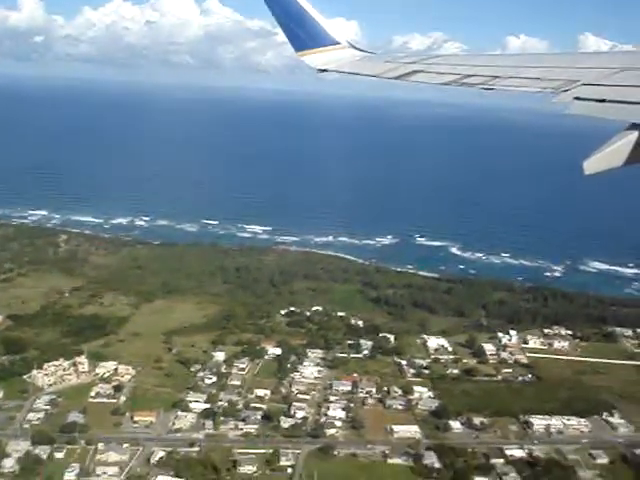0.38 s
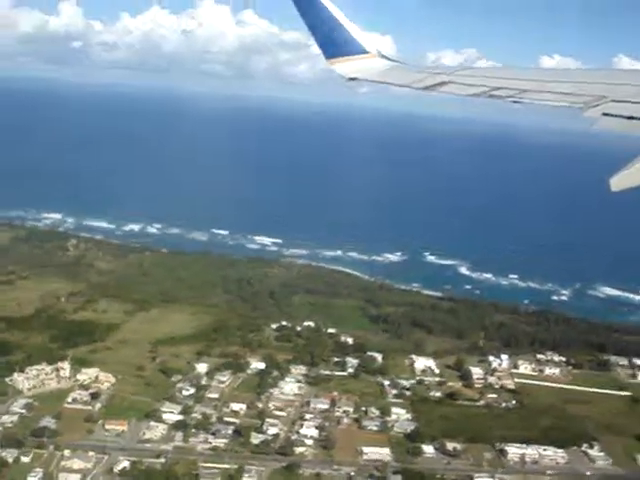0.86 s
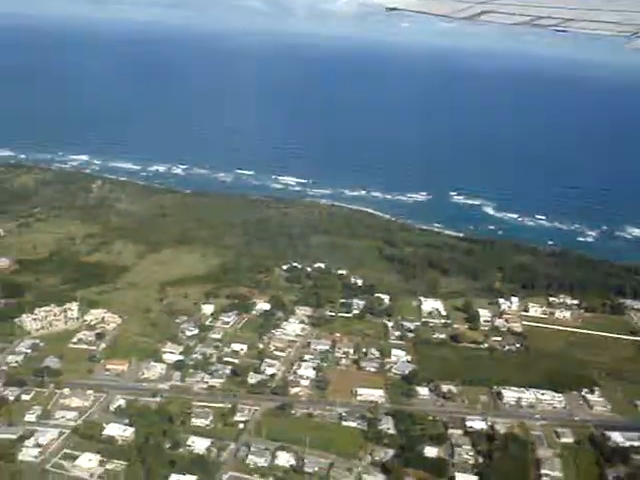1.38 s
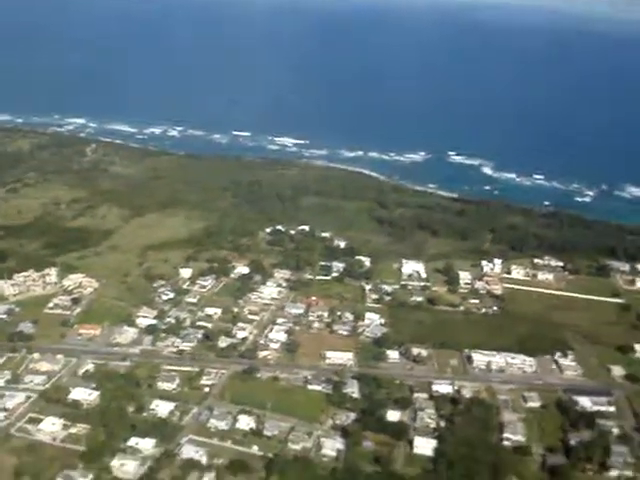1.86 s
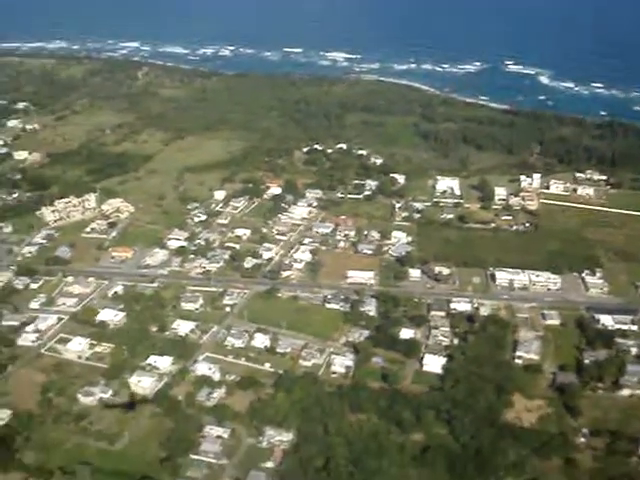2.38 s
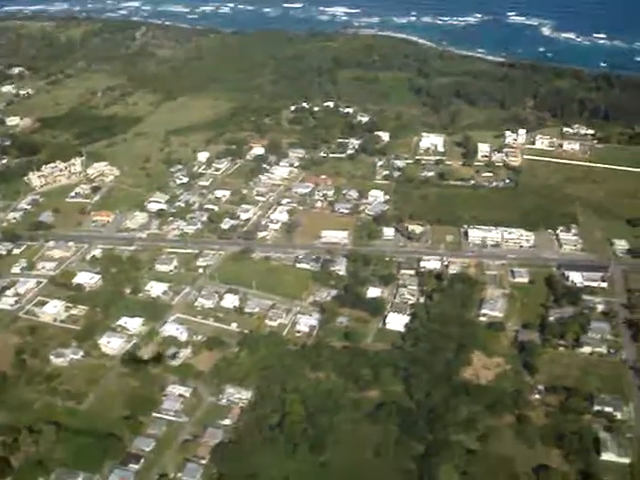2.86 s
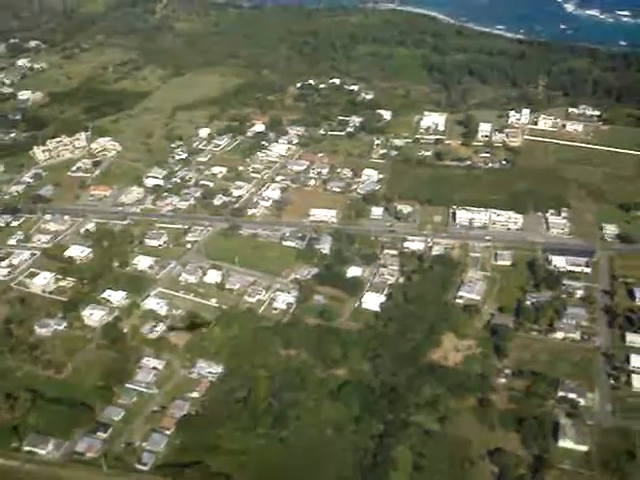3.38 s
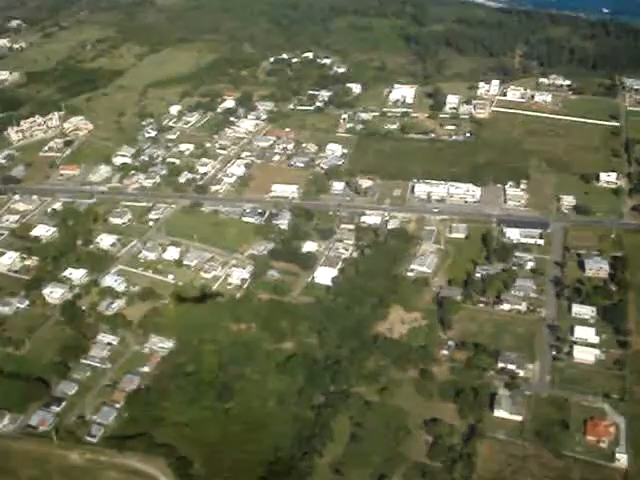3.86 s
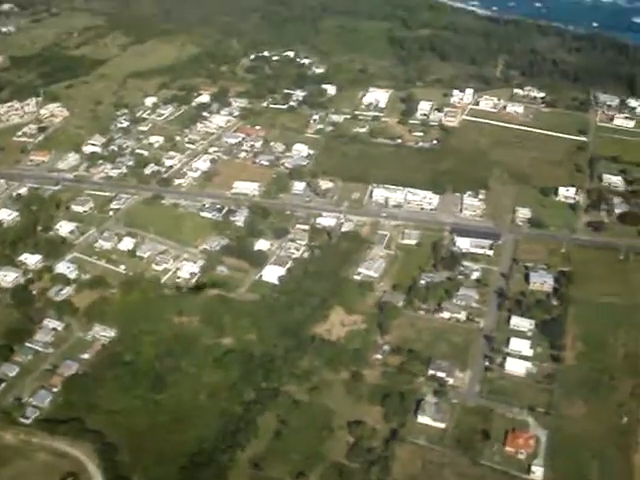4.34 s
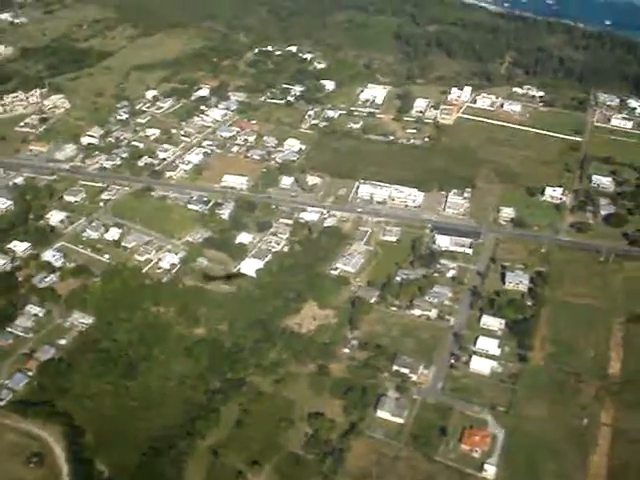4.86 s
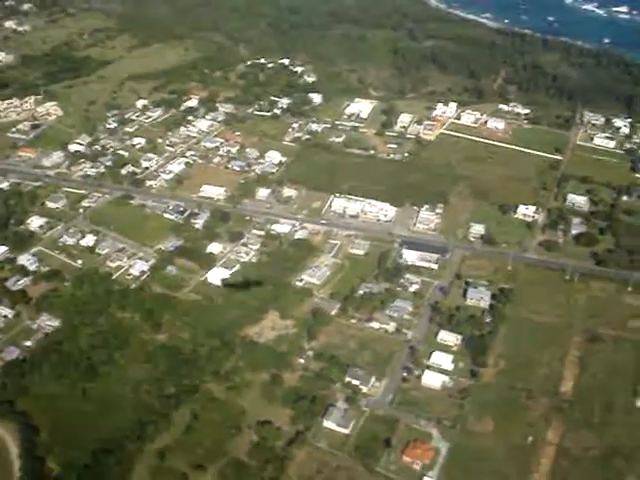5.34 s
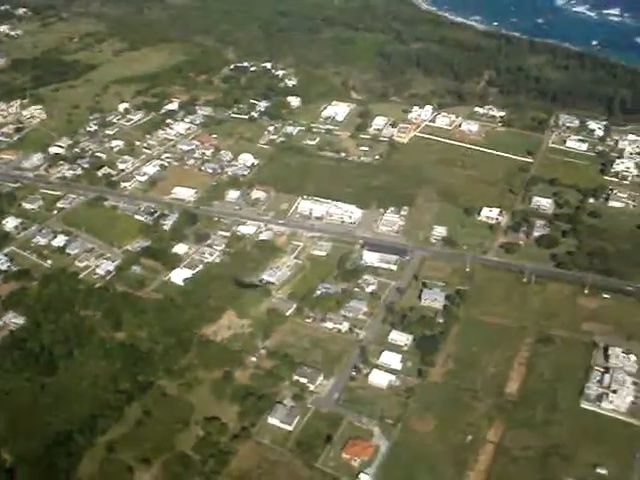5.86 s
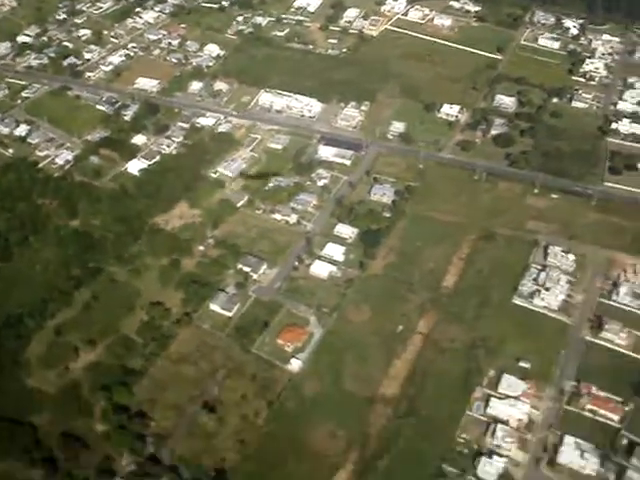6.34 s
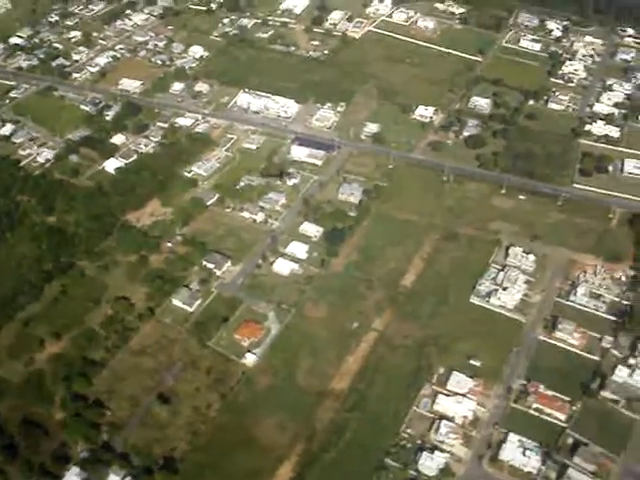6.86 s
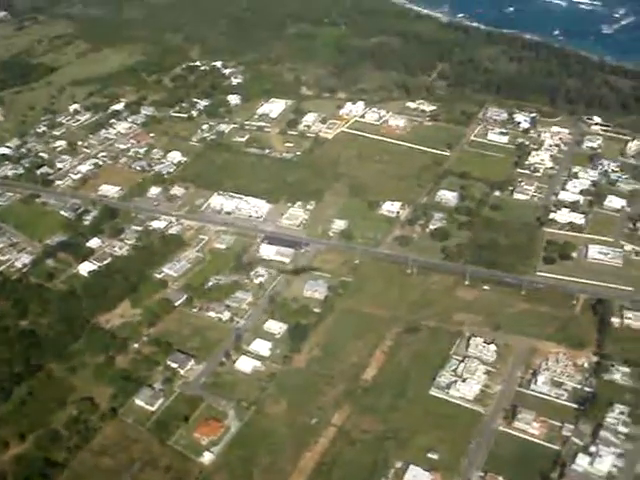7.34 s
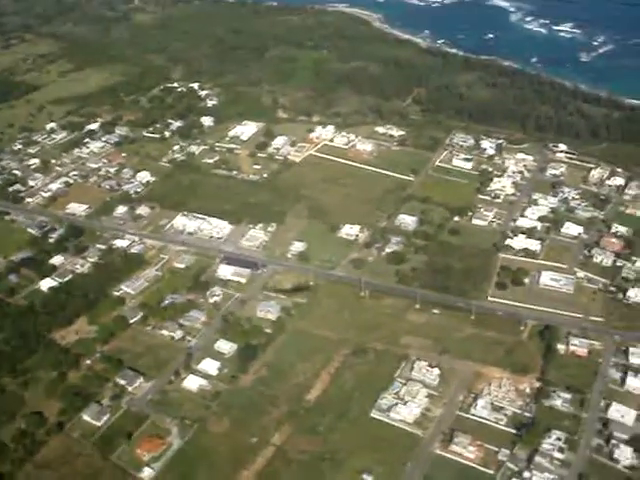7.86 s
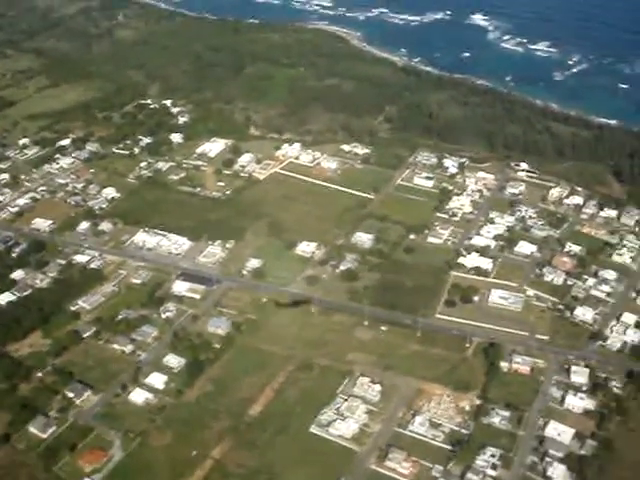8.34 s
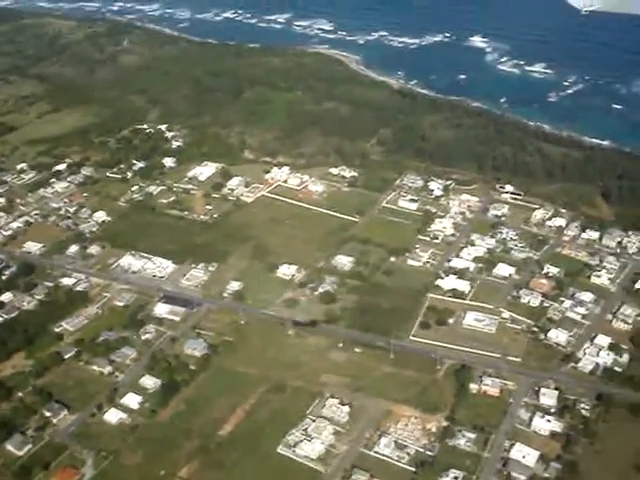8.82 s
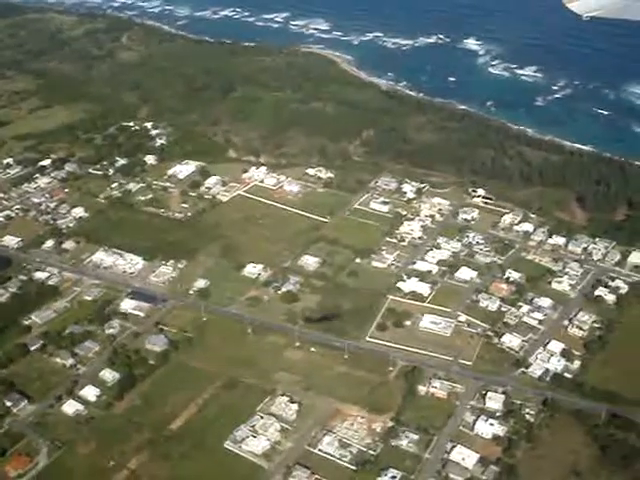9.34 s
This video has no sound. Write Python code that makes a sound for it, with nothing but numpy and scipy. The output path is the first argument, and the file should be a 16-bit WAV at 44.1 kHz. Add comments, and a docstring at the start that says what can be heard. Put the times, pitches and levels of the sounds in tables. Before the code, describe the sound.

Inside a climbing passenger jet near the window, deep engine rumble drones continuously under a flickering hiss of air, the low end crunching with overload.

```python
"""A loud, booming jet roar with a hiss over it: the cabin of a climbing airliner, close to a window.
Jet roar shakes the fuselage and booms in the cabin: shaped noise with resonances.
Air rushing along the skin adds a flickering hiss, combed by its echo off the pane; four soft puffs join it.
A small camera microphone takes it all, and the boom drives its input stage into its rails,
the upper one much sooner."""
import sys
import numpy as np
from scipy import signal
from scipy.fft import rfft, irfft
from scipy.io import wavfile
from scipy.ndimage import uniform_filter1d

SR = 44100
rng = np.random.default_rng(int(sys.argv[2]) if len(sys.argv) > 2 else 0)


def natural_amplitude(level_db):
    """Convert a level in decibels to a linear amplitude factor, elementwise."""
    exponent = np.asarray(level_db, float) / 20
    return 10 ** exponent


def persist_wave(psi):
    """Save psi, clipped to +-1, as 16-bit WAV."""
    counts = np.round(np.clip(psi, -1, 1) * 32767).astype(np.int16)
    wavfile.write(sys.argv[1], SR, np.atleast_2d(counts).T)


N = 417186  # length in samples

# Jet roar through the wall, relative spectrum: [f/Hz, density/dB]
ROAR_SPECTRUM = [(15, -52.5), (25, -28.5), (76, -12.5), (128, -9.5), (167, -6), (238, -7.5), (314, 0.5),
                 (356, -3), (484, -17.5), (629, -15.5), (1000, -34), (1300, -60), (2200, -120)]
# Cabin and wall-panel resonances and dips that the roar excites: [f/Hz, width/Hz, lift/dB]
CABIN_RESONANCES = [(93, 31, 4.5), (110, 12, 1), (132, 14, 0), (182.6, 46, 5.5), (229.7, 18, 5.5),
                    (282.3, 23, 3), (306, 28, 2.5), (320.5, 26, 3.5), (357, 30, 3.5), (425, 37, 3.5),
                    (538, 31, -3.5), (598, 60, 0), (804, 56, 3)]
# Level of the upper roar, which sinks slowly and partly returns: [t/s, level/dB]
UPPER_ROAR_LEVEL = [(0, -31), (.8, -30.5), (3.2, -34), (5.8, -35.5), (7.2, -36.5), (8.4, -32.5),
                    (9.46, -34.5)]
# Air rushing along the skin, relative spectrum: [f/Hz, density/dB]
RUSH_SPECTRUM = [(530, -30.5), (900, -4.5), (1160, -2), (1280, -5), (1740, -7), (2050, -9), (2380, -11.5),
                 (3150, -11), (4170, -18), (5050, -18.5), (8090, -24.5), (9880, -27), (12800, -59.5),
                 (21700, -120)]
# Window and trim resonances and dips in the rush: [f/Hz, width/Hz, lift/dB]
WINDOW_RESONANCES = [(1120, 110, 3.5), (1466, 200, 4), (1990, 50, 3), (2079, 50, 7.5), (2133, 40, -6),
                     (2200, 80, 3.5), (2500, 80, 1.5), (2990, 110, -6), (3088, 90, 5.5), (3200, 120, -1.5),
                     (3510, 100, 1), (3700, 300, 1.5), (4930, 250, 1.5)]
# Level of the hiss: [t/s, level/dB]
HISS_LEVEL = [(0, -38.5), (.5, -37.5), (2, -37.5), (3.1, -37), (5, -37.2), (8.3, -37.5), (9.46, -38)]
# The hand-held microphone drifts near the window, which changes the echo off the pane
# and a broad treble hump that slides down as the echo lengthens: [t/s, echo delay/ms, hump/dB]
PANE_DISTANCE = [(0, .44, 0), (1.2, .44, 0.5), (3, .47, 3.5), (5, .5, 1), (6.6, .49, .5), (8, .48, 3),
                 (9.46, .47, 2.5)]
# Short soft puffs of hiss near the microphone: [t/s, peak level/dB, bell length/s]
PUFF_TIMES = [(1.031, -44, 0.022), (4.051, -53, 0.013), (7.78, -53, 0.018), (8.38, -53.5, .015)]


def evened(x):
    """Scales to rms 1."""
    return x / np.sqrt(np.mean(x ** 2) + 1e-20)


def colour_db(points, resonances, hz):
    """A smooth spectrum, straight over log frequency, with resonance humps and dips on it."""
    f, level = np.transpose(points)
    smooth = np.interp(np.log(hz + 1), np.log(f + 1), level)
    humps = sum(lift / (1 + (2 * (hz - centre) / width) ** 2) for centre, width, lift in resonances)
    return smooth + humps


def above(hz, edge_hz):
    """Share 0-1 that rises smoothly through the edge."""
    return hz ** 4 / (hz ** 4 + edge_hz ** 4)


def bell(x, centre, width):
    """Bell curve of height 1; width is its standard deviation."""
    return np.exp(-.5 * ((x - centre) / width) ** 2)


def curve(rows, t):
    """Columns of a time table, joined by straight lines."""
    s, *columns = np.transpose(rows)
    return [np.interp(t, s, c) for c in columns]


def roar():
    """Steady noise through the cabin resonances; the boom grows slowly, the upper roar drifts."""
    boom_start_db, boom_rise_db_per_s = -14.6, 0.0983
    hz, t = np.fft.rfftfreq(N, 1 / SR), np.arange(N) / SR
    colour = natural_amplitude(colour_db(ROAR_SPECTRUM, CABIN_RESONANCES, hz))
    spectrum = rfft(rng.standard_normal(N)) * colour
    upper_share = above(hz, edge_hz=497) ** 2
    boom = evened(irfft(spectrum * (1 - upper_share), N))
    upper = evened(irfft(spectrum * upper_share, N))
    upper_db, = curve(UPPER_ROAR_LEVEL, t)
    return natural_amplitude(boom_start_db + boom_rise_db_per_s * t) * boom + natural_amplitude(upper_db) * upper


def rush():
    """Turbulent hiss: drifting patches, a flutter strongest in the treble, and the echo off the pane."""
    hop, size = 256, 1024  # samples
    echo_strength = 0.12
    hump_cycles = 3.55  # cycles of the hump's centre within one echo delay
    frames, hz = N // hop + 5, np.fft.rfftfreq(size, 1 / SR)[:, None]
    t = np.arange(frames) * hop / SR
    real, imaginary, patches = rng.standard_normal((frames, len(hz), 3)).T
    patches = uniform_filter1d(patches, size=20, axis=0)  # broad in frequency
    patches = evened(uniform_filter1d(patches, size=5, axis=1))  # lasting a few frames
    flutter = evened(uniform_filter1d(rng.standard_normal(frames), size=4))  # one for all frequencies

    treble = above(hz, edge_hz=4000)
    uneven_db = (0.43 + 0.68 * treble) * patches + (0.24 + 0.71 * treble) * flutter
    uneven_db += -1 * bell(t, centre=6.7, width=.2)  # the hiss dips briefly once: dB, s, s
    delay_ms, hump_db = curve(PANE_DISTANCE, t)
    delay_s = delay_ms / 1000
    uneven_db += hump_db * bell(hz, centre=hump_cycles / delay_s, width=600)
    # the echo returns inverted and cancels a comb of the hiss
    comb = abs(1 - echo_strength * np.exp(-2j * np.pi * hz * delay_s))

    colour = natural_amplitude(colour_db(RUSH_SPECTRUM, WINDOW_RESONANCES, hz) + uneven_db)
    spectra = (real + 1j * imaginary) * comb * colour
    hiss = signal.istft(spectra, nperseg=size, noverlap=size - hop)[1][:N]
    level_db, = curve(HISS_LEVEL, np.arange(N) / SR)
    return natural_amplitude(level_db) * evened(hiss)


def puffs():
    """Bright noise, high-passed at 4 kHz, under short bell-shaped swells."""
    t = np.arange(N) / SR
    swells = sum(natural_amplitude(db) * bell(t, s, length) for s, db, length in PUFF_TIMES)
    highpass = signal.butter(2, 4000, "high", fs=SR, output="sos")
    bright = signal.sosfilt(highpass, rng.standard_normal(N))
    return swells * evened(bright)


def scene():
    """All sources at the one microphone by the window."""
    return (roar() + rush() + puffs())[None]


def top_cut(x):
    """Nothing passes above the cut-off."""
    return signal.sosfilt(signal.butter(12, 10030, fs=SR, output="sos"), x)


def record(dry):
    """The input stage rounds into its uneven rails; a coupling capacitor tilts the flat tops."""
    rail = np.where(dry > 0, .44, .7)  # upper, lower
    sharpness = 7.9  # higher is a harder corner
    held = dry / (1 + abs(dry / rail) ** sharpness) ** (1 / sharpness)
    capacitor = signal.butter(1, 18, "high", fs=SR, output="sos")  # edge in Hz
    coupled = signal.sosfilt(capacitor, held)
    return top_cut(coupled)


dry = scene()
out = record(dry)
persist_wave(out)
```